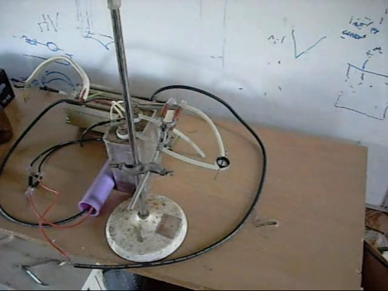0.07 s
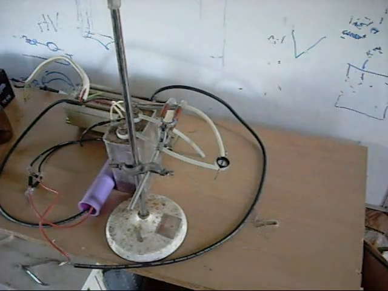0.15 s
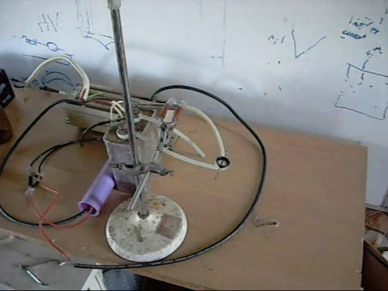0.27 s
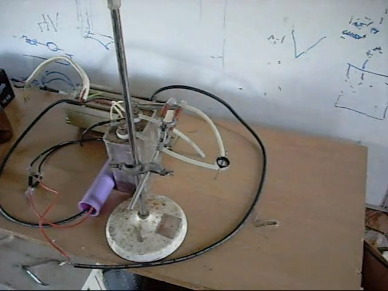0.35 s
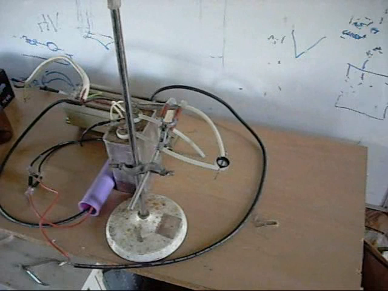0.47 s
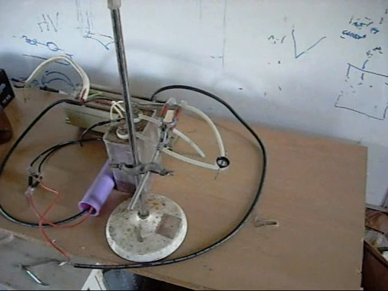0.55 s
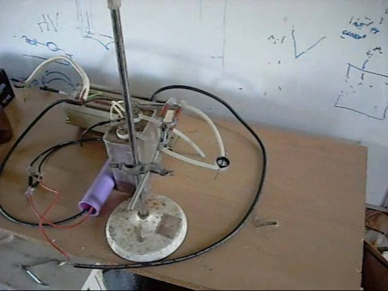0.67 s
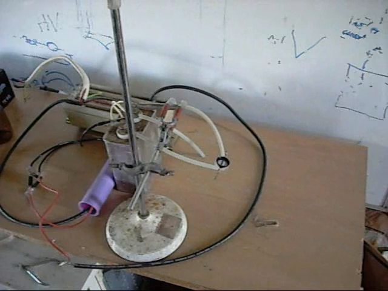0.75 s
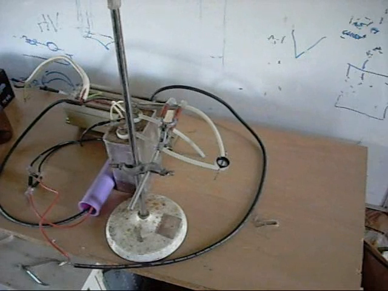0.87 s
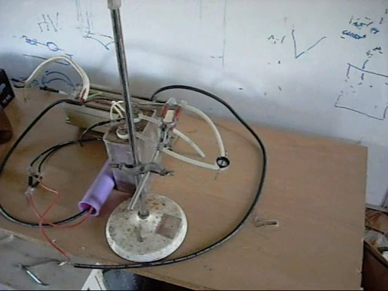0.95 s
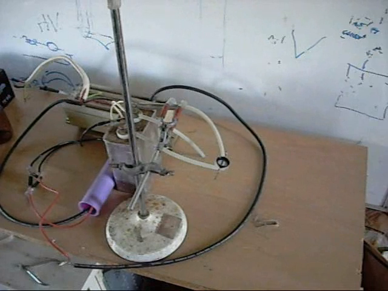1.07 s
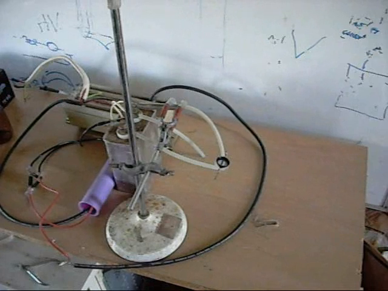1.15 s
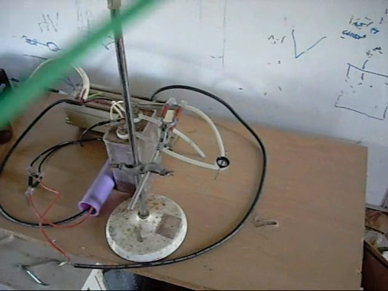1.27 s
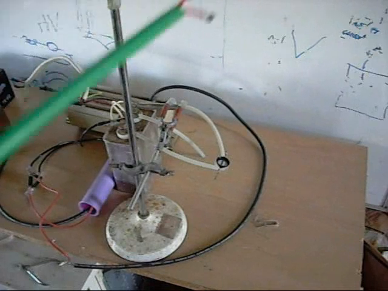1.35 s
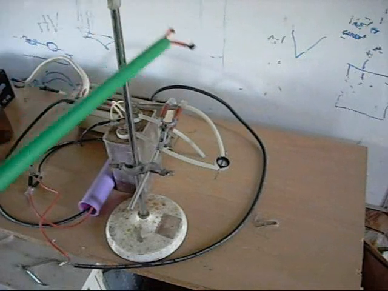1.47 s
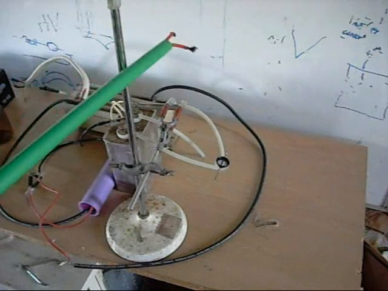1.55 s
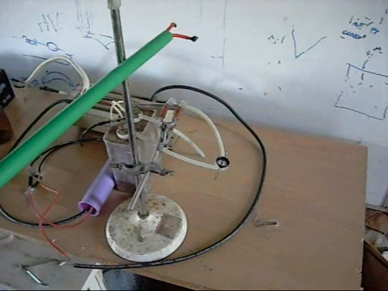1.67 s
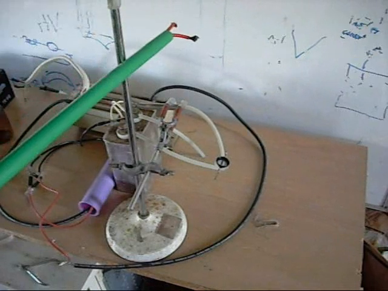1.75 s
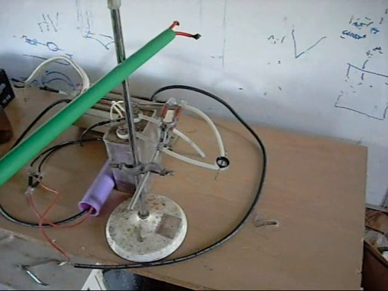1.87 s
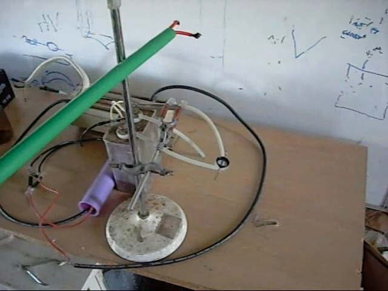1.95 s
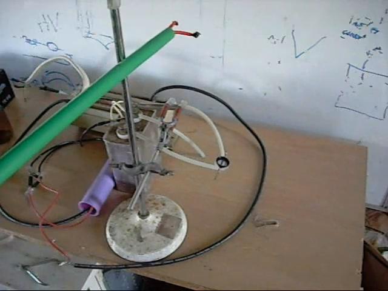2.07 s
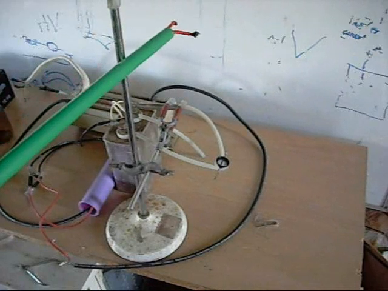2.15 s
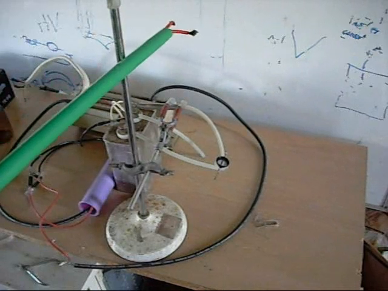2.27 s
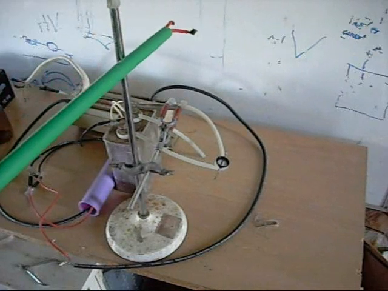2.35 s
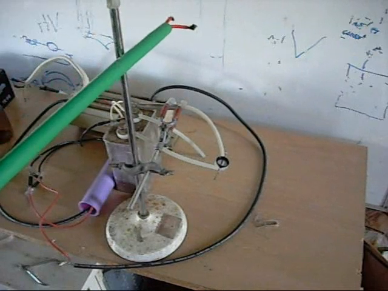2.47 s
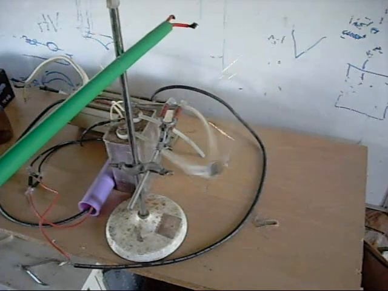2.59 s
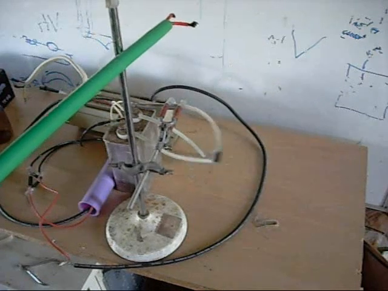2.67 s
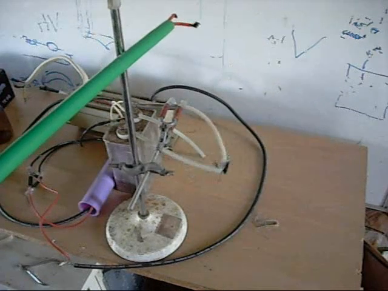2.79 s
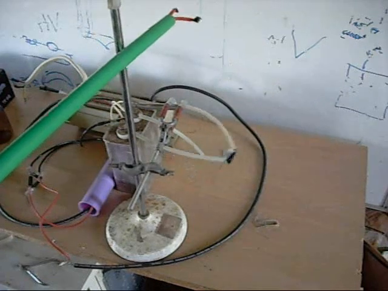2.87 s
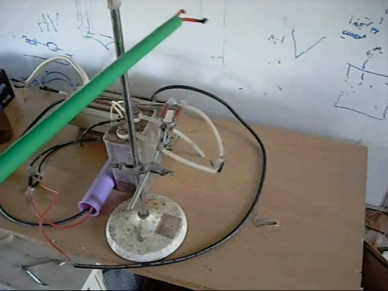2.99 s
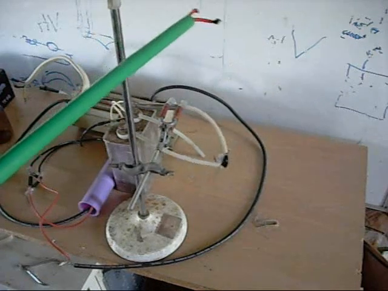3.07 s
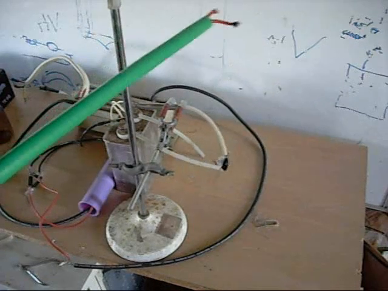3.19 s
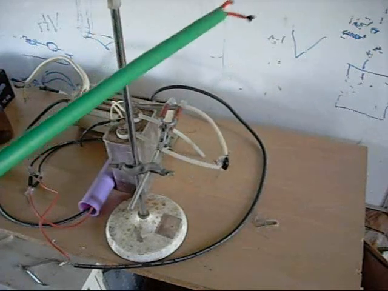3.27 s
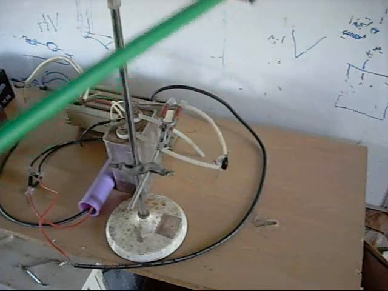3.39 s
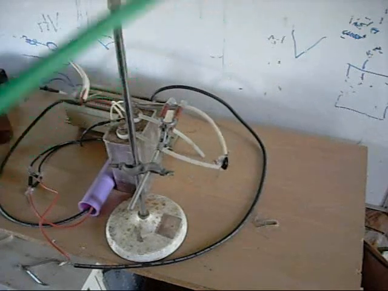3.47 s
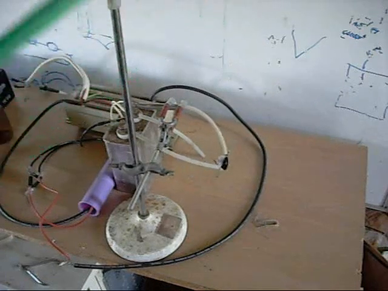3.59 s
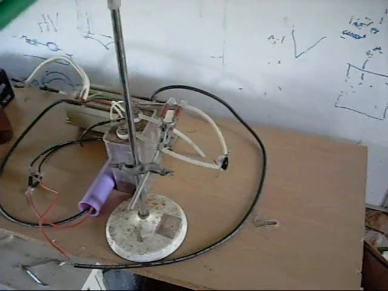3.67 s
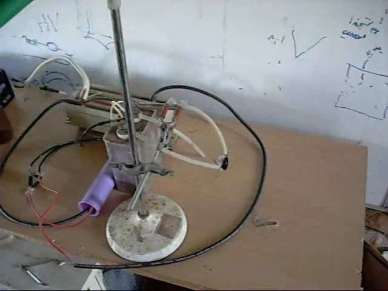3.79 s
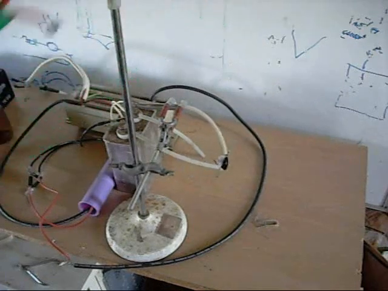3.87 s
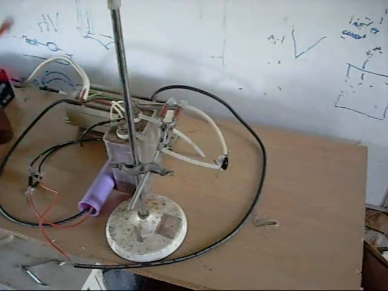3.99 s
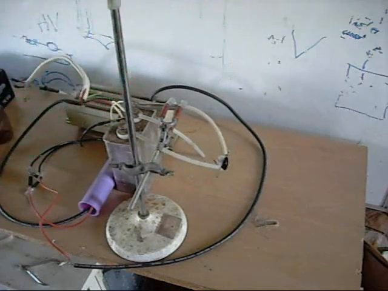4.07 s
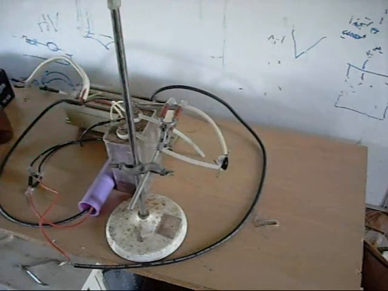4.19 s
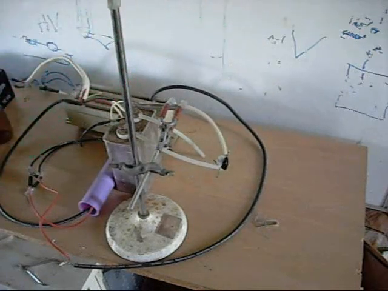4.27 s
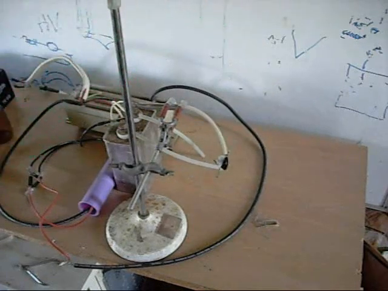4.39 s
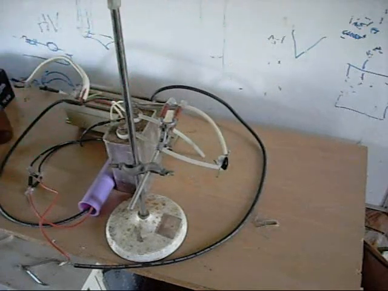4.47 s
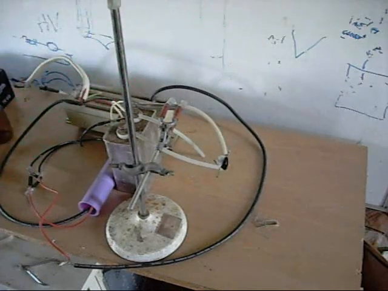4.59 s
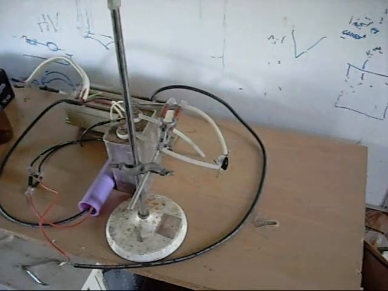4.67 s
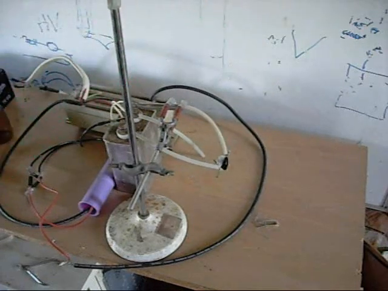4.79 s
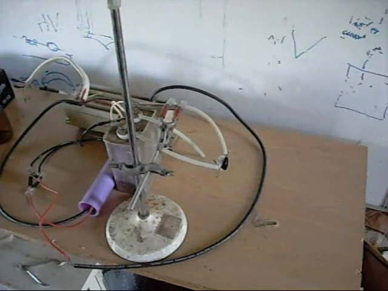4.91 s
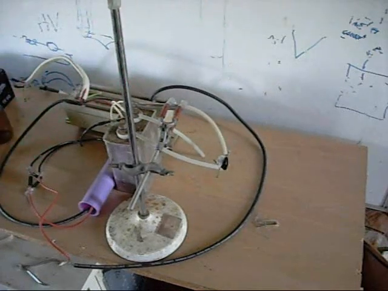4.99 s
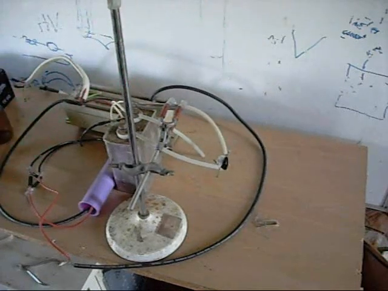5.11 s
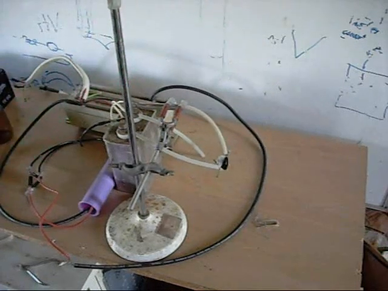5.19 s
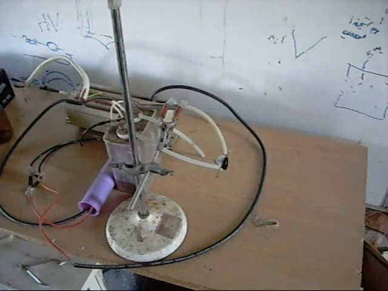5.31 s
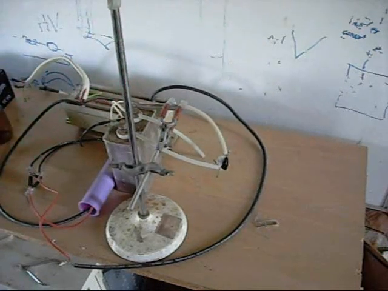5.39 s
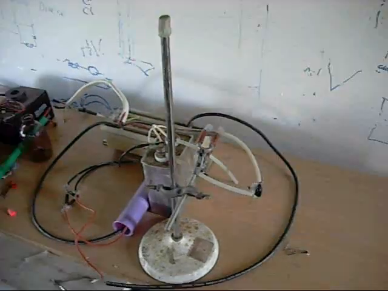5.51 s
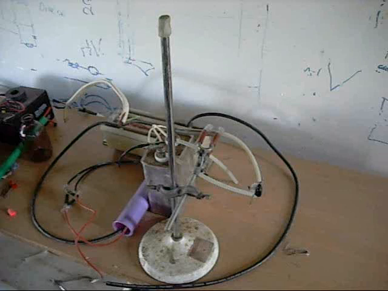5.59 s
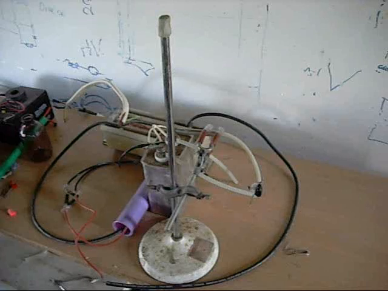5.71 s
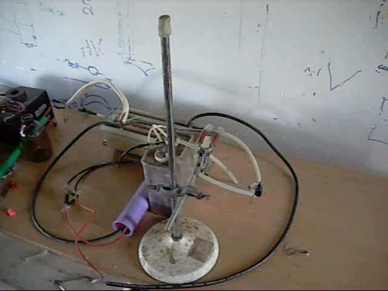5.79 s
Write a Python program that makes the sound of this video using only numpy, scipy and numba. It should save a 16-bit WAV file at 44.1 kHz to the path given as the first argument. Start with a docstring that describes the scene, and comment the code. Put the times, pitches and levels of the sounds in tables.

```python
"""A capacitor bank sparks over on a workshop bench: one bang, noise shaped by the decay of a bare room.
Before it a metal rod clinks twice, as snap pulses and decaying modes; after it come ticks, a rustle of
cloth made of uneven noise grains, and a knock that sets off the modes of the camera body.
Rumble and hiss lie beneath. The overloaded camera limits, clips and holds coarse 8-bit samples at a low
rate, so the treble is mirrored and the hush flips between two steps."""
import sys
import numpy as np
from scipy import signal
from scipy.fft import rfft, irfft
from scipy.io import wavfile
from scipy.ndimage import uniform_filter1d
from numba import njit

SR = 44100
rng = np.random.default_rng(int(sys.argv[2]) if len(sys.argv) > 2 else 0)


def int16_out(signal):
    """Quantize to a 16-bit WAV file."""
    q = np.round(np.clip(np.atleast_2d(signal).T, -1, 1) * 32767)
    wavfile.write(sys.argv[1], SR, q.astype(np.int16))


N = 257940  # samples

BANG_S = 2.6753  # onset of the spark

# Spectrum of a hard contact. Each row: frequency in Hz, relative density in dB per Hz.
SNAP_SPECTRUM = [(900, -41.5), (1600, -22), (2300, -7.5), (3200, -18), (4300, -5.5), (5400, -3.5),
                 (6500, -39)]
# Throbs of the level while the bang is loud. Each row: start in seconds, rise above the trough in dB,
# hold in seconds.
LEVEL_THROBS = [(2.7, 7.5, 0.0095), (2.7193, 8.5, .005), (2.741, 9.5, .004), (2.749, 4.5, .004),
                (2.763, 8, 0.0064), (2.7745, 5.5, .005), (2.787, 7, 0.011), (2.806, 5, 0.0042),
                (2.8175, 3.5, .003)]


def undb(db):
    """Decibels express an amplitude ratio on a logarithmic scale, 20 to the decade."""
    return 10 ** (np.asarray(db) / 20)


def colour(x, points):
    """Linear filtering: (Hz, dB) points weight the spectrum without phase shift; white noise keeps its rms."""
    hz, db = np.transpose(points)
    f = np.maximum(np.fft.rfftfreq(len(x), 1 / SR), 1)
    gain = undb(np.interp(np.log(f), np.log(hz), db))
    unit_gain = gain / np.sqrt(np.mean(gain ** 2))
    return irfft(rfft(x) * unit_gain, len(x))


def filtered(x, order, hz, kind="low"):
    """Butterworth filtering, run forward and backward so that the phase shifts cancel."""
    return signal.sosfiltfilt(signal.butter(order, hz, kind, fs=SR, output="sos"), x)


def fade(t, t60):
    """Exponential decay: silent before time zero, 60 dB down after t60 seconds."""
    return (t >= 0) * np.exp(-np.log(1000) * np.maximum(t, 0) / t60)


def ring(at, db, modes):
    """Modal superposition: one blow sets off damped sines (Hz, dB, t60 s) together."""
    t = np.arange(N) / SR - at
    return sum(undb(db + g) * np.sin(2 * np.pi * hz * t) * fade(t, t60) for hz, g, t60 in modes)


def click(at, db):
    """Ideal impulse: a single sample holds all frequencies equally."""
    return undb(db) * (np.arange(N) == int(at * SR))


def walk(rate):
    """Slow random modulation: Gaussian levels, one every 1 / rate seconds, joined by straight ramps."""
    k = int(SR / rate)
    levels = np.repeat(rng.standard_normal(N // k + 1), k)
    return 1.6 * uniform_filter1d(levels, k)[:N]


def bang():
    """Convolution principle: a spark far shorter than the room's answer only colours that answer."""
    # Spectrum of the spark. Each row: frequency in Hz, relative density in dB per Hz.
    spark = [(60, -38), (200, -26), (500, -24.5), (1000, -18.5), (2000, -12), (3000, -6), (4200, 0),
             (5400, 0.5), (6500, -41)]
    # Steel stand that sings on. Each row: frequency in Hz, level in dB, t60 in seconds.
    stand = [(3930, -52, .8), (4500, -49, 1.4), (4509, -52, 1.4)]
    # Bench top that thuds under the blast. Each row: frequency in Hz, level in dB, t60 in seconds.
    punch = [(195, -12, 0.06), (390, -15, .05), (708, -9, 0.06), (925, -12, .05), (1250, -11, .04)]
    # Returns of the thud from the walls. Each row: arrival in seconds, level in dB.
    slaps = [(2.7022, -8), (2.7655, -19)]
    crack = colour(np.pad(room(), (0, SR)), spark)[:SR]
    first_20_ms = crack[:SR // 50]
    crack = crack * undb(7.5) / np.sqrt(np.mean(first_20_ms ** 2))
    out, k = np.zeros(N), int(BANG_S * SR)
    out[k:k + SR] = crack
    shove = ring(BANG_S, -23, [(18, 0, .12)])  # the blast shoves the microphone once
    thud = ring(BANG_S, 0, punch)
    returns = sum(ring(s, db, punch[3:]) for s, db in slaps)  # without the bass
    return out - shove + ring(BANG_S, 0, stand) - (thud + returns)


def room():
    """Diffuse reverberation: half-octave bands of noise each decay at their own rate."""
    # Decay of the room. Each row: frequency in Hz, t60 in seconds.
    decay = [(100, .15), (400, 0.22), (800, .26), (1200, 0.26), (1900, .27), (3000, 0.295), (5400, 0.26)]
    # Weak, long answer of the next room. Each row: lower edge in Hz, upper edge in Hz, level in dB,
    # t60 in seconds, delay in seconds.
    next_room = [(275, 1100, -30, .9, 0), (850, 3400, -36, .8, 0), (900, 1500, -44, .5, .25),
                 (2000, 4400, -60, .4, .325)]
    rise_cycles = 3  # the answer builds up over a few cycles, so its lows come late
    t = np.arange(SR) / SR

    def noise_band(low, high):
        """Filtered noise: a band-pass confines white noise between two edges."""
        band_pass = signal.butter(2, [low, high], "band", fs=SR, output="sos")
        return signal.sosfilt(band_pass, rng.standard_normal(SR))

    hz, t60 = np.transpose(decay)
    tail = 0
    for low in 40 * 2. ** np.arange(0, 8, .5):
        band_t60 = np.interp(np.log(low), np.log(hz), t60)
        build_up = np.minimum(t * low / rise_cycles, 1)
        tail = tail + noise_band(low, np.sqrt(2) * low) * fade(t, band_t60) * build_up
    for low, high, db, late_t60, lag in next_room:
        tail = tail + noise_band(low, high) * undb(db) * fade(t - lag, late_t60)
    return tail


def clinks(grit):
    """Impact excitation: a dry snap, its bench echoes and room wash, while the rod's modes ring faintly."""
    # Contacts of the rod. Each row: start in seconds, snap in dB, clank in dB, note in dB, scrape in dB,
    # share of the clank's t60 (no unit).
    contacts = [(1.5597, -10, -20, -53, -50, 1), (1.6784, -28, -18, -72, -50, .5),
                (1.6833, -42, -36, -80, -54, 1)]
    # Short clank of the rod. Each row: frequency in Hz, level in dB, full t60 in seconds.
    rod = [(2260, -14, .018), (3880, -28, 0.04), (4300, -12.5, .024), (5200, -24, .015)]
    # Long beating note of the rod. Each row: frequency in Hz, level in dB, t60 in seconds.
    rod_note = [(1593, 0, .45), (1620, -9, .2)]
    # Echoes off the bench. Each row: delay in seconds, level relative to the snap in dB.
    bench_echoes = [(.0011, -11.5), (.0043, -10.5), (.0075, -18), (0.0174, -14.5)]
    wash_db, wash_t60_s = -36, .25  # wash in the room, relative to the snap
    scrape_s, clank_rise_s, note_rise_s = .0019, .0011, .02
    snaps, rings = 0, 0
    for s, snap_db, clank_db, note_db, scrape_db, free in contacts:
        t = np.arange(N) / SR - s
        echoes = sum(click(s + lag, snap_db + db) for lag, db in bench_echoes)
        wash = undb(snap_db + wash_db) * grit * fade(t, wash_t60_s)
        scrape = undb(scrape_db) * grit * (t > 0) * (t < scrape_s)
        snaps = snaps + click(s, snap_db) + echoes + wash + scrape
        clank_modes = [(hz, db, t60 * free) for hz, db, t60 in rod]
        rings = rings + ring(s, clank_db, clank_modes) * np.clip(t / clank_rise_s, 0, 1)
        rings = rings + ring(s, note_db, rod_note) * np.clip(t / note_rise_s, 0, 1)
    return rings - colour(snaps, SNAP_SPECTRUM)


def ticks(grit):
    """Impact of small hard things: a coloured impulse, then a decaying noise of grit."""
    # Each row: start in seconds, pulse in dB, grit that follows in dB, t60 of the grit in seconds.
    hard_ticks = [(2.832, 0, -30, .004), (3.766, -36, -52, .06), (5.131, -36, -56, .01),
                  (5.205, -44, -56, .02)]
    t = np.arange(N) / SR
    hits = sum(click(s, db) + undb(grit_db) * grit * fade(t - s, t60)
               for s, db, grit_db, t60 in hard_ticks)
    return colour(hits, SNAP_SPECTRUM)


def knock():
    """Modal response: a knock on the camera sets off the short resonances of its body."""
    # Each row: frequency in Hz, level in dB, t60 in seconds.
    camera_body = [(667, -15, 0.033), (1750, 2.5, 0.01), (2550, -3, 0.011), (3310, -12, .01)]
    return ring(5.8412, -28.5, camera_body)


def rustle():
    """Stick-slip friction: fibres slip in dense, uneven crackles; each rub swells, holds and dies."""
    # Spectrum of the cloth. Each row: frequency in Hz, relative density in dB per Hz.
    cloth_spectrum = [(1900, -47), (2250, -6.5), (3000, -4.5), (3750, -7), (4100, -0.5), (5400, -0.5),
                      (6500, -41)]
    # Rubs. Each row: start in seconds, swell in seconds, hold in seconds, t60 in seconds, level in dB,
    # gain of the duller part in dB.
    rubs = [(4.884, .004, .015, 0.046, -58.5, -12), (5.009, .02, 0.013, .04, -51.5, -9.5),
            (5.061, .01, 0.0088, .08, -54.5, -8), (5.379, .005, 0.052, 0.072, -47.5, 0),
            (5.446, 0.00093, .006, .03, -45, -7), (5.455, .004, .02, .08, -55, -3),
            (5.482, .005, .014, .05, -54, -4), (5.514, .005, 0.038, .1, -60, -6)]
    split_hz = 3800  # the duller part lies below
    jerk_db, jerks_per_s = 1.5, 250
    grains = rng.standard_normal(N) * undb(2.5 * rng.exponential(size=N))
    grains = grains * undb(jerk_db * walk(jerks_per_s))
    cloth = colour(grains / np.std(grains), cloth_spectrum)
    dull = filtered(cloth, 4, split_hz)
    t = np.arange(N) / SR
    out = 0
    for s, swell, hold, t60, db, dull_db in rubs:
        rise = np.clip((t - s) / swell, 0, 1)
        decay = fade(np.maximum(t - s - swell - hold, 0), t60)
        out = out + undb(db) * rise * decay * (cloth + dull * (undb(dull_db) - 1))
    return out


def hush():
    """Stationary noise, slowly modulated: rumble of the building and hiss of the microphone wander."""
    # Spectrum of the hush. Each row: frequency in Hz, relative density in dB per Hz.
    hush_spectrum = [(20, 1.5), (45, 3.5), (75, -5.5), (170, -3), (280, -11), (800, -11.5), (2500, -14.5),
                     (5400, -13), (6500, -50)]
    # Swell and ebb of the rumble. Each row: time in seconds, gain in dB.
    rumble = [(0, -1.5), (.45, -4), (1.2, 1), (1.65, -2), (2, 2), (2.6, 1), (3, 0.5), (3.7, -2), (4.2, 0.5),
              (4.8, 3), (5.3, 0), (5.5, -2.5), (5.85, -0.5)]
    # Level of the mids. Each row: time in seconds, gain in dB.
    mid_levels = [(0, 0), (.75, -.5), (1.37, 2), (1.8, 0), (2.4, 1), (3.2, 0), (4.05, 0), (4.4, 3),
                  (4.64, 0), (5, -1), (5.4, 0), (5.85, 1)]
    # Edges of the mid band: lower in Hz, upper in Hz.
    mid_edges = [450, 1500]
    t = np.arange(N) / SR
    air = colour(rng.standard_normal(N), hush_spectrum)
    low = filtered(air, 2, 250)
    swell = undb(np.interp(t, *np.transpose(rumble)))
    mids = filtered(air, 2, mid_edges, "band")
    stir = undb(np.interp(t, *np.transpose(mid_levels)))
    wander = undb(-64 + .8 * walk(4.8))  # about a base level of -64 dB
    return (air + low * (swell - 1) + mids * (stir - 1)) * wander


def scene():
    """Linear superposition: the pressures of all sources add."""
    grit = rng.standard_normal(N)
    return (bang() + clinks(grit) + ticks(grit) + knock() + rustle() + hush())[None]


@njit
def follow(x, attack, release):
    """Envelope detection: first-order smoothing of the magnitude, with separate rates up and down."""
    e, out = 0., np.empty(len(x))
    for i in range(len(x)):
        e += (abs(x[i]) - e) * (attack if abs(x[i]) > e else release)
        out[i] = e
    return out


def throb_db(t):
    """Amplitude modulation: the loud bang's level jumps, holds and sags; its first crack is softer."""
    rise_s, sag_s, trough_db, until_s = .002, .0038, -1, 2.821
    crack_dip_db, crack_dip_s = -12, .007
    starts, db, hold = np.transpose(LEVEL_THROBS)
    last = np.maximum(np.searchsorted(starts, t) - 1, 0)
    since = np.maximum(t - starts[last], 0)
    jump = np.clip(since / rise_s, 0, 1)
    sag = np.exp(-np.maximum(since - rise_s - hold[last], 0) / sag_s)
    beat = db[last] * jump * sag + trough_db
    first_crack = (t > BANG_S) * (t < BANG_S + crack_dip_s)
    return beat * (t > starts[0]) * (t < until_s) + crack_dip_db * first_crack


def record(dry):
    """Quantization and aliasing: late gain control, then an 8-bit converter that clips and holds samples."""
    port_hz, top_hz = 5400, 9700  # low-pass edges before and after the converter
    limit_db, lag_s, attack_s, release_s = -12.5, .006, .0003, .02  # the lag lets the first crack through
    split_hz, bass_even_s = 900, .012  # below the split the throb is averaged this long either side
    step, hold = .0023, 4  # amplitude of one 8-bit step, samples held
    louder_s, louder_db = 5.6, 1.5  # everything steps up a little near the end
    gap_s, gap_length_s = 5.592, .007  # the sound drops out for an instant
    t = np.arange(N) / SR

    x = signal.sosfilt(signal.ellip(6, .5, 50, port_hz, fs=SR, output="sos"), dry[0])
    loud = follow(x, 1 / (attack_s * SR), 1 / (release_s * SR))
    loud = np.pad(loud, (int(lag_s * SR), 0))[:N]
    gain_reduction = np.maximum(loud / undb(limit_db), 1)

    bass = filtered(x, 2, split_hz)
    throb = throb_db(t)
    smooth = uniform_filter1d(throb, int(2 * bass_even_s * SR))
    even = np.where(t > LEVEL_THROBS[0][0], smooth, throb)
    x = ((x - bass) * undb(throb) + bass * undb(even)) / gain_reduction

    # holding without a steep low-pass leaves the mirrored treble
    steps = np.clip(np.floor(x[::hold] / step), -128, 127)
    held = np.repeat(steps * step, hold)[:N] * undb(louder_db * (t > louder_s))
    held = np.where((t > gap_s) & (t < gap_s + gap_length_s), -step / 2, held)
    return signal.sosfilt(signal.ellip(10, .2, 70, top_hz, fs=SR, output="sos"), held)[None]


dry = scene()
out = record(dry)
int16_out(out)
```